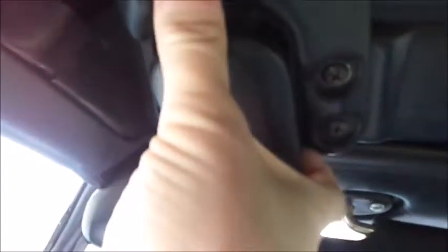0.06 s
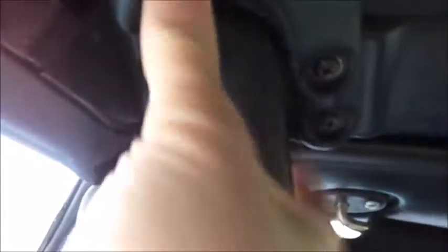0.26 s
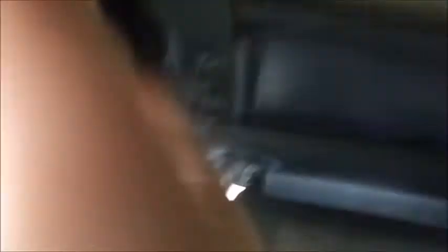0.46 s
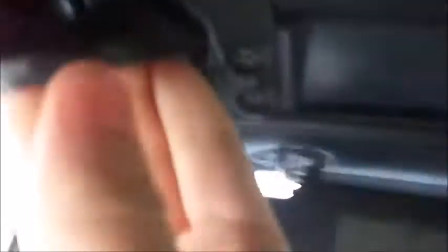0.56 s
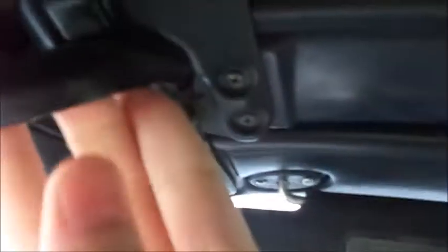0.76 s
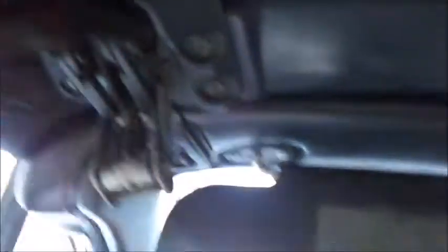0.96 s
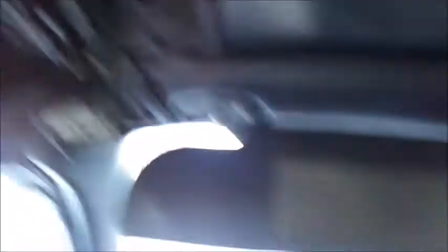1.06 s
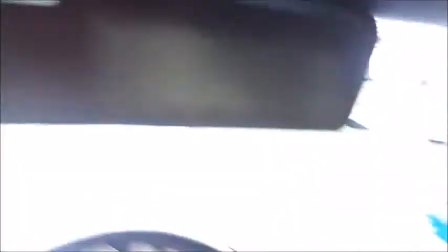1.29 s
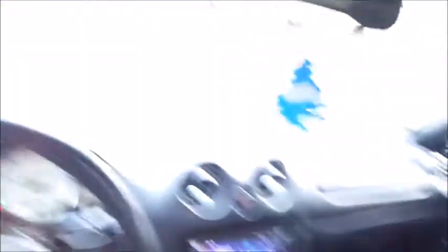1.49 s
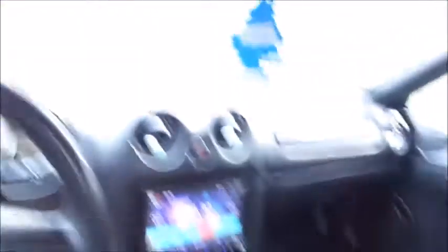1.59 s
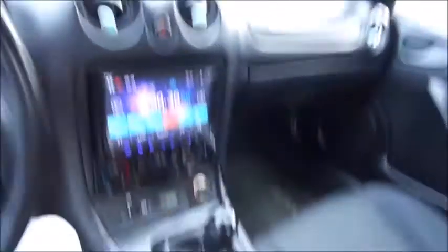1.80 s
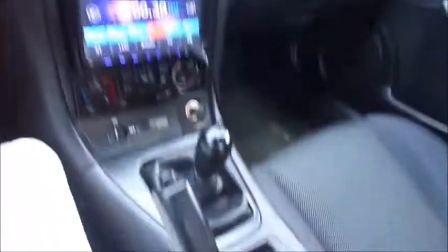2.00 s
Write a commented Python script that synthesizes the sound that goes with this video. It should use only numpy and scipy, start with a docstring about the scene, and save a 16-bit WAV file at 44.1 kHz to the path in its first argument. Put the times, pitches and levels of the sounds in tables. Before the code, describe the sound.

A convertible roof latch is undone by hand, close up in a small padded cabin. After faint ticks, the lever pops sharply at about 0.25 seconds. The metal hook snaps near 0.35, the linkage clacks and rattles, and the handle slams against its stop at 0.6, the loudest hits slightly overloaded. Soft bumps and light ticks follow over a low hum, with a clearer tick around 1.8 seconds.

```python
"""Faint ticks and soft hand bumps over a low hum, then a sharp pop: a hand undoes the roof latch of
a parked convertible, close up. The lever springs free, the steel hook snaps, the linkage rattles and
the handle slams against its stop, shaking the windscreen frame. Each contact is a thud, a clack and
a crack of dying noise; the main blows also ring the part they strike. The small padded cabin answers
briefly and a few handling ticks follow. The loudest clacks overload the recorder."""
import sys
import numpy as np
from scipy import signal
from scipy.fft import rfft, irfft, next_fast_len
from scipy.io import wavfile
from scipy.ndimage import uniform_filter1d, map_coordinates

SR = 44100
rng = np.random.default_rng(int(sys.argv[2]) if len(sys.argv) > 2 else 0)


def dump(signal):
    """Clip the signal to [-1, 1] and save it as 16-bit WAV at the path in sys.argv[1]."""
    limited = np.clip(np.atleast_2d(signal).T, -1, 1)
    pcm = np.round(limited * 32767).astype(np.int16)
    wavfile.write(sys.argv[1], SR, pcm)


N = 90404
SNAP_RISE_S = 0.00012  # attack of every hard contact


def amp(db):
    """Decibels to gain."""
    return 10 ** (np.asarray(db) / 20)


def unit(x):
    """Scale to rms 1."""
    return x / np.sqrt(np.mean(x ** 2) + 1e-20)


def along(points, hz):
    """Read a curve of (Hz, value) points on a log frequency axis."""
    points_hz, values = np.transpose(points)
    return np.interp(np.log(hz + 1), np.log(points_hz + 1), values)


def bell(hz, centre_hz, width_oct):
    """An EQ bell of height 1, down to half at width_oct either side of its centre."""
    return 1 / (1 + (np.log2((hz + 1) / centre_hz) / width_oct) ** 2)


def filtered(x, response):
    """Equalise x with a gain given as a function of frequency."""
    size = next_fast_len(N + SR // 2)
    return irfft(rfft(x, size) * response(np.fft.rfftfreq(size, 1 / SR)), size)[..., :N]


def wobble(rate_hz):
    """A smooth random curve with rate_hz knots a second."""
    knots = rng.standard_normal(int(N * rate_hz / SR) + 4)
    return map_coordinates(knots, [np.arange(N) * rate_hz / SR])


def add(track, start_s, sound):
    """Mix a sound into the track at start_s."""
    part = track[max(0, round(start_s * SR)):][:len(sound)]
    part += sound[:len(part)]


def burst(colour_db, rise_s, t60_s, size=8192):
    """A dense cluster of dying resonances: decaying noise shaped to the given colour."""
    t, hz = np.arange(size) / SR, np.fft.rfftfreq(size, 1 / SR)
    envelope = amp(-60 * t / t60_s) * (1 - np.exp(-t / rise_s))
    spectrum = rfft(rng.standard_normal(size) * envelope)
    broad_shape = np.sqrt(np.abs(uniform_filter1d(np.abs(spectrum) ** 2, size=91)) + 1e-12)
    gain = unit(amp(colour_db(hz))) * np.linalg.norm(envelope) / broad_shape
    # minimum phase, so the EQ does not ring ahead of the attack
    cepstrum = irfft(np.log(gain + 1e-9))
    cepstrum[1:size // 2] *= 2
    cepstrum[size // 2 + 1:] = 0
    return irfft(spectrum * np.exp(rfft(cepstrum)))


def ring(modes):
    """The damped modes of one struck part, alternating in polarity."""
    t = np.arange(SR // 3) / SR
    tones = sum((-1) ** k * amp(level_db - 60 * t / t60_s) * np.sin(2 * np.pi * pitch_hz * t)
                for k, (pitch_hz, level_db, t60_s) in enumerate(modes))
    return tones * (1 - np.exp(-t / SNAP_RISE_S))


def noise_floor():
    """An even rush: strong rumble, faint hiss."""
    # colour of the rush: frequency_hz, gain_db
    rush_eq = [(12, -44), (20, -5), (76, -13.5), (139, -2.5), (199, -4), (235, -11), (286, -4.5),
               (367, -13.5), (484, -9.5), (674, -17), (940, -15), (1080, -17.5), (1210, -15.5),
               (1730, -23.5), (1880, -24.5), (4310, -33.5), (15000, -38)]
    rush = filtered(rng.standard_normal(N), lambda hz: amp(along(rush_eq, hz)) * (hz < 15100))
    return amp(-45.5) * unit(rush)


def background():
    """A bed of rush and wavering hum whose low mids slowly swell and sink."""
    # tones of the hum: pitch_hz, level_db
    hum_tones = [(26.8, -63), (107.7, -66), (134.6, -54), (167, -64), (290, -57), (1238, -61.5)]
    # level ride on the low mids: time_s, gain_db
    swell = [(0, -1.5), (.5, 8.5), (.78, -1), (.93, 2.5), (1.1, -1.5), (1.48, .5), (1.78, -4.5),
             (2.03, -5.5)]
    waver_rad, low_cut_hz, high_cut_hz = 0.53, 120, 810
    t = np.arange(N) / SR
    hum = sum(amp(level_db) * unit(np.sin(2 * np.pi * pitch_hz * t + waver_rad * wobble(rate_hz=8.9)))
              for pitch_hz, level_db in hum_tones)
    bed = noise_floor() + hum
    band = lambda hz: hz ** 2 / (hz ** 2 + low_cut_hz ** 2) / (1 + (hz / high_cut_hz) ** 2)
    swell_gain = amp(np.interp(t, *np.transpose(swell)))
    return bed + (swell_gain - 1) * filtered(bed, band)


def short_tail(x):
    """Smear x through a short tail of decaying noise; treble dies first."""
    # decay of the tail: frequency_hz, t60_s
    decay = [(150, 0.35), (600, 0.14), (2000, 0.087), (6000, 0.09), (14000, 0.083)]
    predelay_s = 0.005
    hz, t, noise = signal.stft(rng.standard_normal(SR // 3), SR, nperseg=256)
    tail = signal.istft(noise * amp(-60 * t / along(decay, hz)[:, None]), SR, nperseg=256)[1]
    tail = np.pad(tail / np.linalg.norm(tail), (round(predelay_s * SR), 0))
    return signal.fftconvolve(x, tail)[:N]


def hand_bumps():
    """Dull, soft-edged knocks of the hand on the handle and trim."""
    # knocks of the hand: start_s, level_db, pitch_hz
    bumps = [(.002, -37, 574), (0.163, -37.5, 193), (.255, -28, 150), (.272, -36, 70), (.289, -37, 620),
             (.338, -32, 332), (.438, -45.5, 50), (.518, -36, 80), (0.651, -42, 160), (.666, -38.5, 570),
             (0.881, -46, 161), (.938, -46.5, 500), (1.725, -42.5, 743)]
    out = np.zeros(N)
    for start_s, level_db, pitch_hz in bumps:
        colour = lambda hz: 18.5 * np.log10(bell(hz, pitch_hz, width_oct=0.53))
        add(out, start_s, amp(level_db) * burst(colour, rise_s=0.0038, t60_s=0.17))
    return out


def handling_ticks():
    """Small ticks, duller or brighter, all ringing the same plastic, and one tiny metal ping."""
    # ticks of the plastic: start_s, level_db, pitch_hz
    ticks = [(0.1142, -38, 2980), (0.156, -41.5, 3040), (0.1735, -30.5, 1350), (0.2152, -45, 2800),
             (.2269, -32.5, 2860), (0.703, -34, 2698), (.7317, -42.5, 3300), (.750, -44.5, 3100),
             (1.4538, -35.5, 3700), (1.5, -46.5, 6600), (1.5401, -40.5, 3000), (1.7283, -44, 800),
             (1.8151, -26, 3000), (1.8377, -40.5, 2190)]
    # resonances of the plastic: pitch_hz, boost_db
    plastic_modes = [(1390, 16), (2000, 13.5), (2450, 6), (3020, 1), (3420, 5), (4470, 3), (5400, 4)]
    # ring of a loose bit of metal: pitch_hz, level_db, t60_s
    ping_modes = [(2950, -44.5, 0.058)]
    plastic = lambda hz: sum(db * bell(hz, mode_hz, width_oct=0.081) for mode_hz, db in plastic_modes)
    rolloff = lambda hz: -8.5 * np.log10(1 + (hz / 6500) ** 4)
    out = np.zeros(N)
    for start_s, level_db, pitch_hz in ticks:
        focus = lambda hz: 30.5 * np.log10(bell(hz, pitch_hz, width_oct=1.34))
        colour = lambda hz: plastic(hz) + rolloff(hz) + focus(hz)
        add(out, start_s, amp(level_db) * burst(colour, SNAP_RISE_S, t60_s=0.021))
    add(out, start_s=1.4994, sound=ring(ping_modes))
    return out


def latch():
    """Each metal contact cracks, clacks and thuds the frame; four main blows ring the part they strike."""
    # metal contacts in the latch, clack and crack sharing one decay:
    # start_s, thud_db, thud_t60_s, clack_db, crack_db, snap_t60_s, clack_pitch_hz, pitch_boost_db
    contacts = [(.2468, -14, .04, -4.5, -14.5, 0.016, 2270, 10),
                (.2752, -31, .07, -30, -37.5, 0.036, 3900, 9),
                (.340, -30.5, .06, -37, -43.5, 0.043, 3000, 3),
                (.3565, -41, .04, -34, -29.5, 0.028, 3900, 5.5),
                (.3638, -13.5, .05, -24, -9, .02, 3020, 20.5),
                (0.3715, -13.5, .045, -35, -43.5, 0.022, 700, -3),
                (.3772, -13.5, .05, -12, -23.5, 0.017, 950, 7.5),
                (0.438, -58, .03, -23.5, -30, 0.023, 1500, 5),
                (.4418, -36.5, .03, -9.5, -27, 0.033, 1800, 13.5),
                (.4457, -6, .025, 0.5, -3.5, 0.0078, 4400, 7.5), (.4500, -25, .025, -9, -41, .02, 1900, 13),
                (.4545, -42, .025, -13, -18, 0.015, 2900, 4), (.458, -49, .03, -25, -14, 0.015, 4500, -6.5),
                (.4680, -53, .03, -19.5, -34.5, 0.02, 1900, 19), (.475, -45, .03, -50, -19, .025, 5000, -2),
                (0.478, -14, .008, -6, -11, 0.0076, 3400, 8),
                (.4835, -39.5, .04, -23, -20.5, 0.03, 3400, -1),
                (.4870, -47, .04, -17.5, -26, 0.018, 3300, -1),
                (0.4971, -56, .04, -38, -30, 0.016, 4500, 2),
                (.5220, -52, .04, -16, -14.5, 0.037, 5400, 38),
                (.5242, -14.5, .045, -4.5, -14.5, 0.014, 1300, 12.5),
                (.530, -17, .05, -19, -53, 0.035, 1000, 1),
                (.5385, -17.5, .06, -16, -44.5, 0.012, 2800, 10),
                (.5603, -29.5, .05, -27, -48.5, 0.059, 1500, 15),
                (.573, -21, .07, -17.5, -28, 0.019, 3000, 1.5),
                (.5822, -6, .05, -9.5, -18, 0.0081, 1170, -7.5),
                (.5997, -9.5, .045, -4, -1, 0.023, 4600, 26), (.6045, -4, .05, -16.5, -10, 0.024, 3000, -8)]
    # colours of a contact's three layers: frequency_hz, gain_db
    thud_eq = [(30, -43), (90, -28), (200, -16.5), (340, -11.5), (480, -3.5), (560, -0.5), (660, -2),
               (980, -10), (1350, -10), (1900, -23), (3500, -27.5), (9000, -77)]
    clack_eq = [(60, -29.5), (300, -12.5), (800, 6.5), (1700, -0.5), (2200, -4.5), (3100, 0), (4000, -6),
                (4700, -4), (6500, -11.5), (14000, -37)]
    crack_eq = [(800, -6), (3000, -1.5), (5000, -13), (6300, -6.5), (7300, -13), (8500, -6.5), (9300, -8.5),
                (10200, -8), (12500, -13.5), (15000, -25.5), (18000, -37.5)]
    # modes of the struck parts: pitch_hz, level_db, t60_s
    lever_modes = [(167.4, -30.5, 0.12), (477, -22, .09), (608, -20.5, 0.078), (790, -20.5, 0.064),
                   (956, -19, 0.028), (1054, -1, 0.02), (1225, -6, 0.049), (1329, -2.5, 0.047),
                   (1913, -15.5, .04), (2060, -15.5, 0.051), (2365, -12, 0.027)]  # the lever springing free
    hook_modes = [(2550, -12, 0.04), (2780, -7, 0.023), (2980, -6, 0.022), (3106, -5, 0.018),
                  (4170, -15, 0.033), (4955, -15, 0.025)]  # the steel hook snapping
    pawl_modes = [(230, -14, .022), (330, -9, .02), (460, -9, .022), (900, -4, .008), (3280, -7, .016),
                  (3500, -9, .022)]  # the pawl going over: a dry knock with a short ping
    plate_modes = [(160, -18.5, 0.14), (257.4, -12.5, 0.12), (358, -15.5, 0.12), (456.6, -4, 0.081),
                   (536.5, -3.5, 0.1), (630, -2, 0.087), (1049, 1, 0.049), (1306, 2, 0.039),
                   (1575, -3.5, .055), (3010, -12.5, 0.048)]  # the mounting plate as the handle hits its stop
    out = np.zeros(N)
    for start_s, thud_db, thud_t60_s, clack_db, crack_db, snap_t60_s, pitch_hz, boost_db in contacts:
        clack_colour = lambda hz: along(clack_eq, hz) + boost_db * bell(hz, pitch_hz, width_oct=0.47)
        thud = burst(lambda hz: along(thud_eq, hz), rise_s=0.0012, t60_s=thud_t60_s)
        clack = burst(clack_colour, SNAP_RISE_S, snap_t60_s)
        crack = burst(lambda hz: along(crack_eq, hz), SNAP_RISE_S, snap_t60_s)
        add(out, start_s, amp(thud_db) * thud + amp(clack_db) * clack + amp(crack_db) * crack)
    add(out, start_s=0.2468, sound=amp(2.5) * ring(lever_modes))
    add(out, start_s=0.3642, sound=amp(-2.5) * ring(hook_modes))
    add(out, start_s=0.4783, sound=amp(-3) * ring(pawl_modes))
    add(out, start_s=0.6025, sound=amp(-8) * ring(plate_modes))
    return out


def scene():
    """Nearly mono: a very faint noise gives slight stereo width."""
    direct = latch() + handling_ticks() + hand_bumps()
    cabin_answer = amp(-19) * short_tail(direct)
    mid = direct + cabin_answer + background()
    width_noise = amp(-49.5) * short_tail(direct) + amp(-37) * noise_floor()
    return np.array([mid + width_noise, mid - width_noise])


def record(dry):
    """The recorder soft-clips the loudest peaks and cuts the top end steeply."""
    ceiling, top_hz = 0.95, 15500
    clipped = dry / (1 + np.abs(dry / ceiling) ** 8) ** (1 / 8)
    return filtered(clipped, lambda hz: 1 / np.sqrt(1 + (hz / top_hz) ** 160))


dry = scene()
out = record(dry)
dump(out)
```